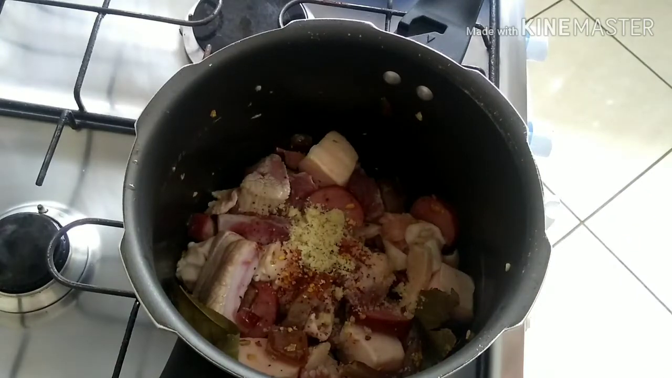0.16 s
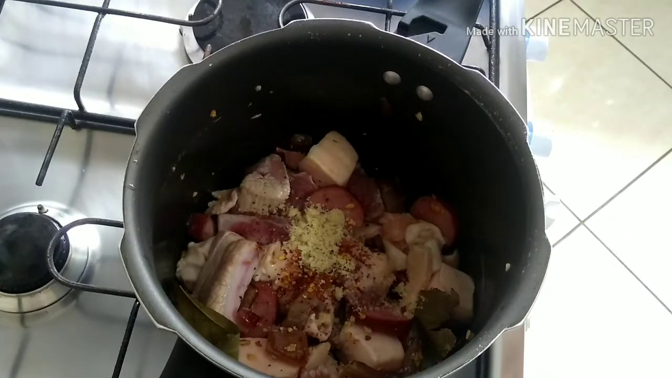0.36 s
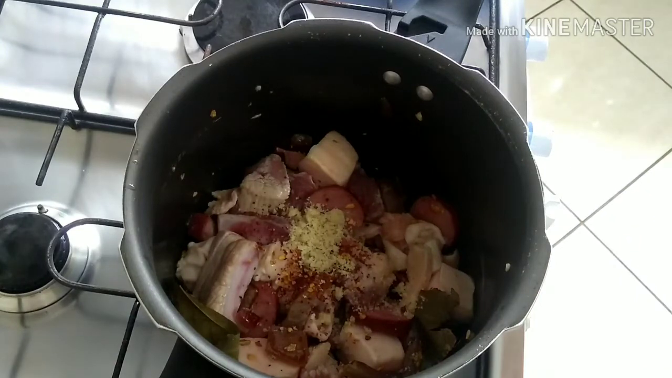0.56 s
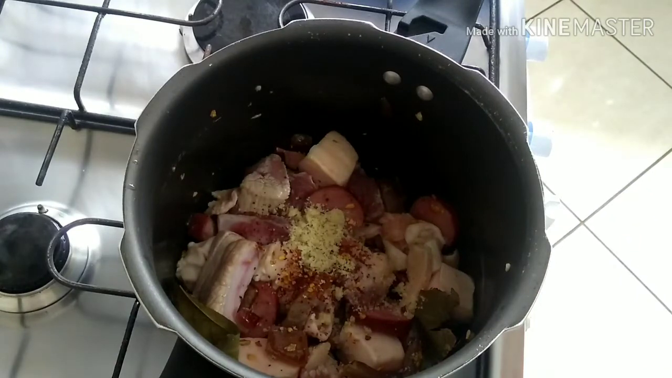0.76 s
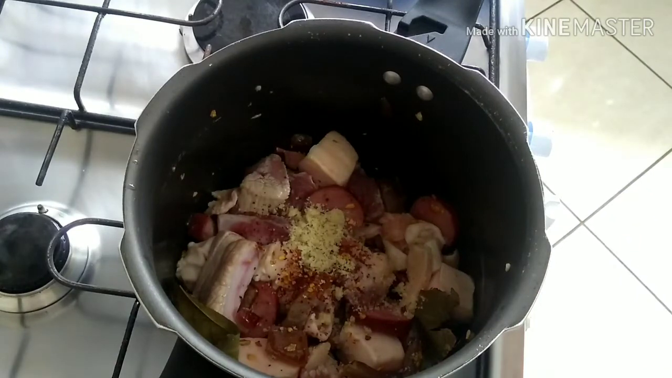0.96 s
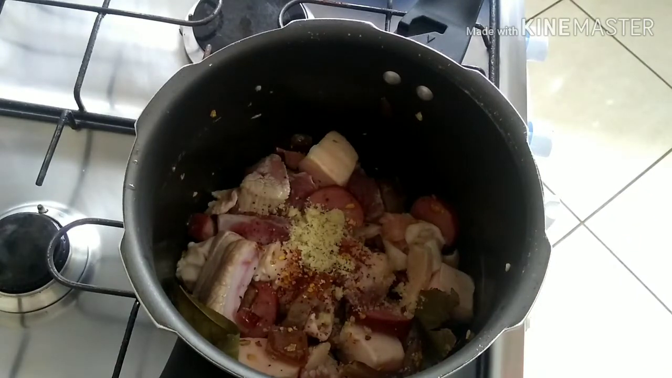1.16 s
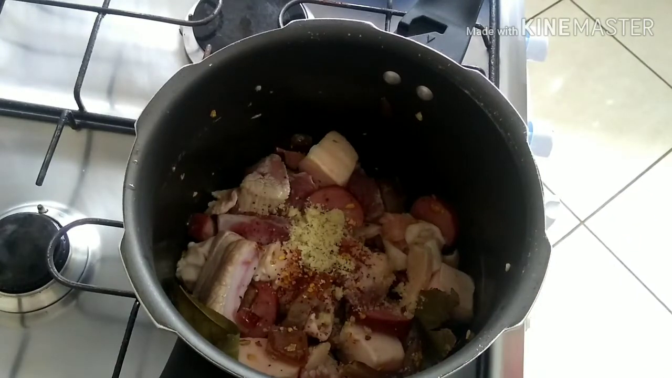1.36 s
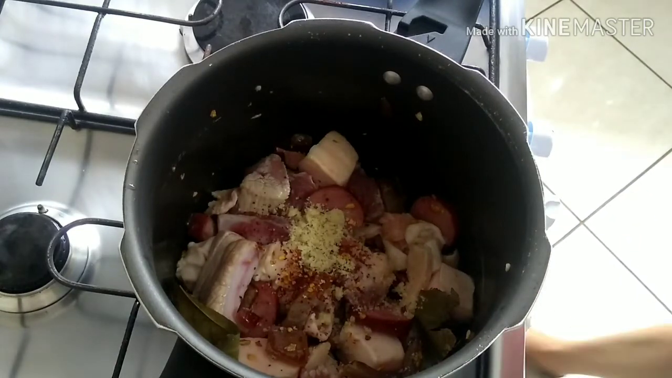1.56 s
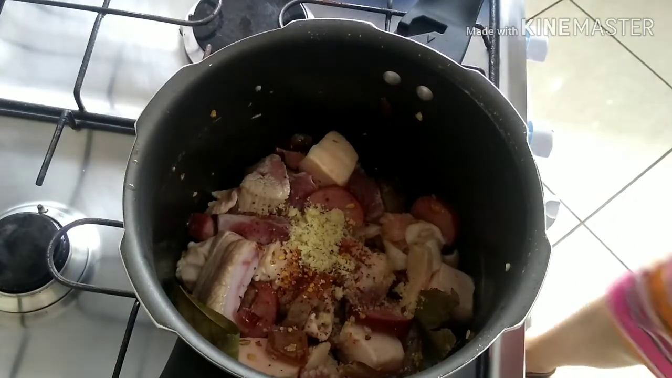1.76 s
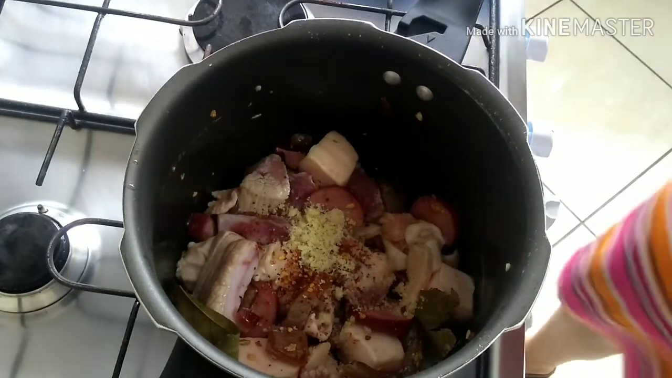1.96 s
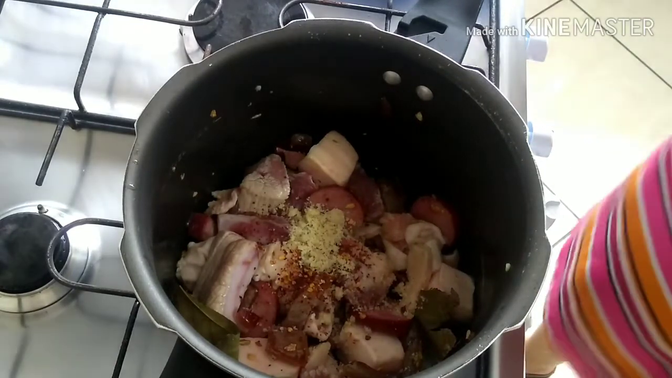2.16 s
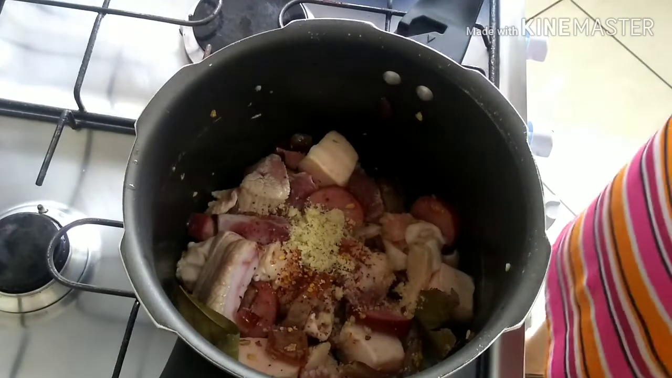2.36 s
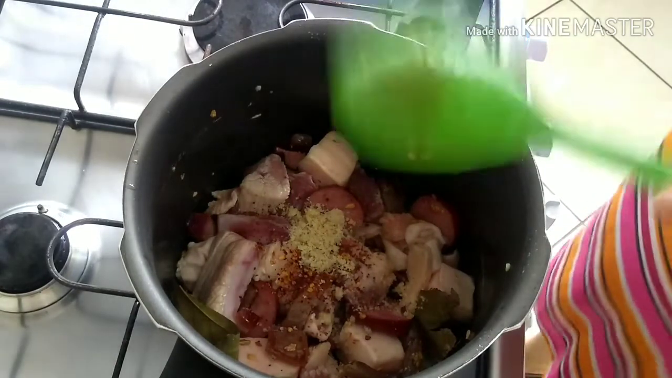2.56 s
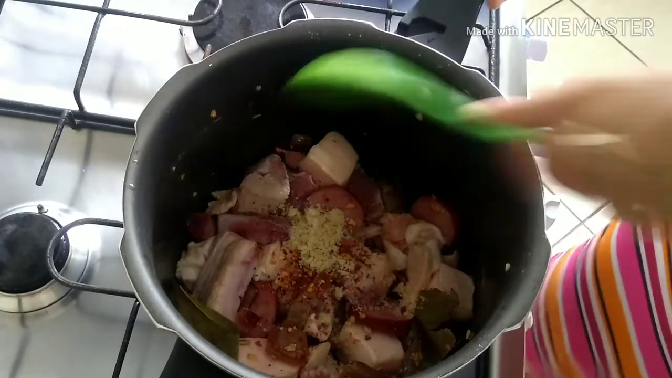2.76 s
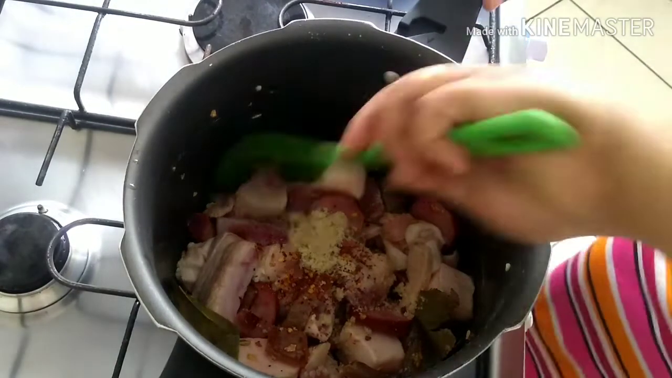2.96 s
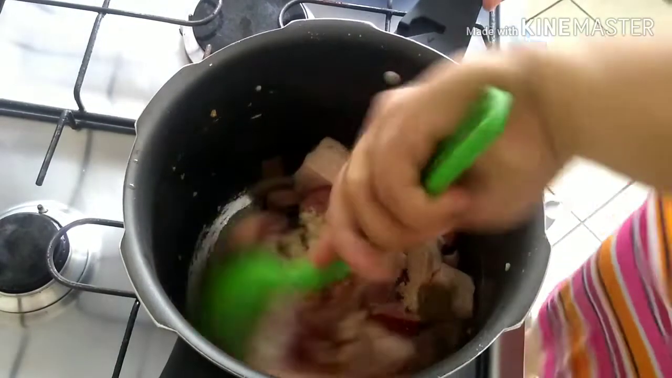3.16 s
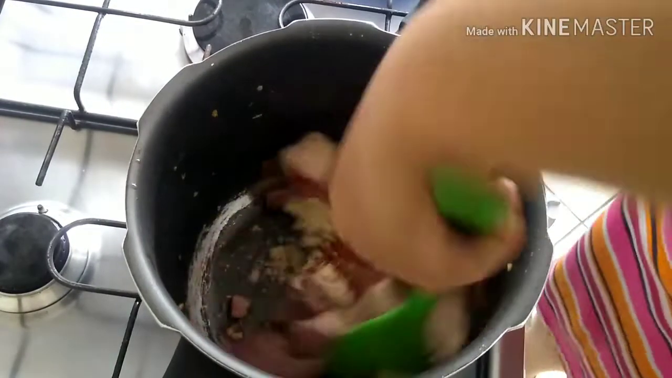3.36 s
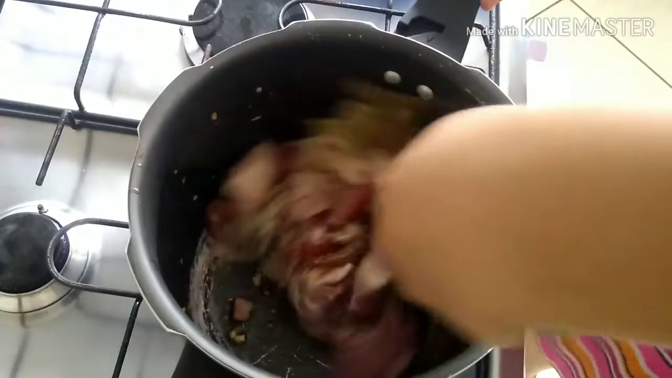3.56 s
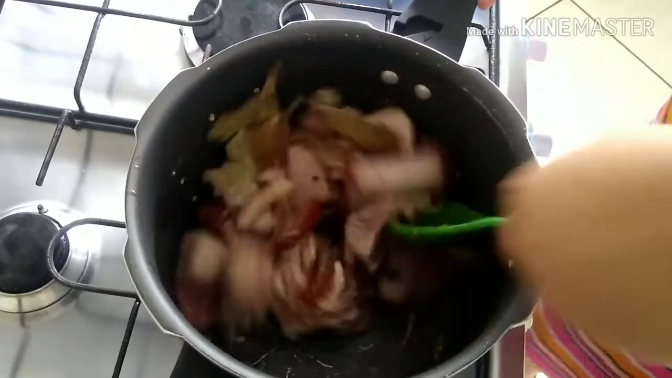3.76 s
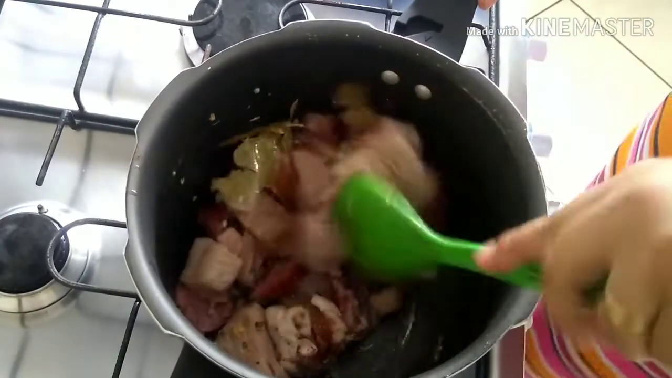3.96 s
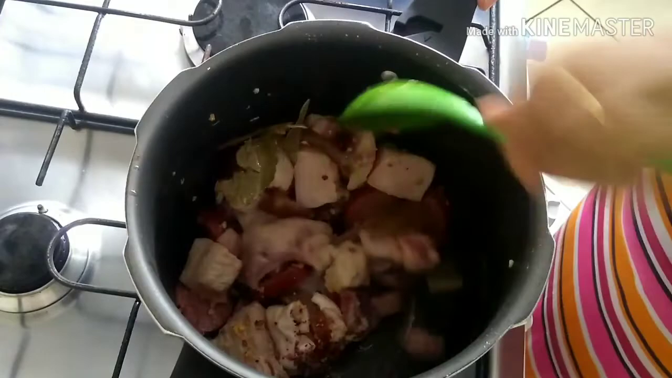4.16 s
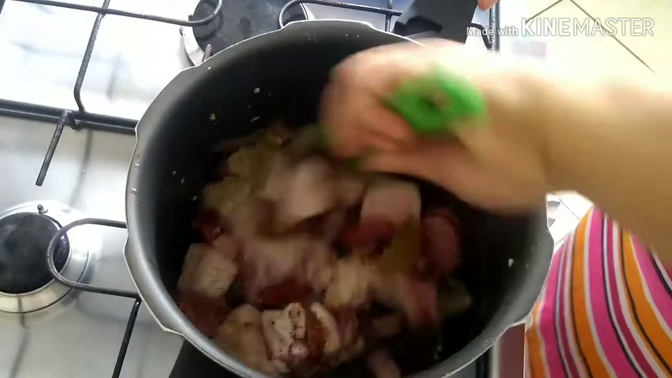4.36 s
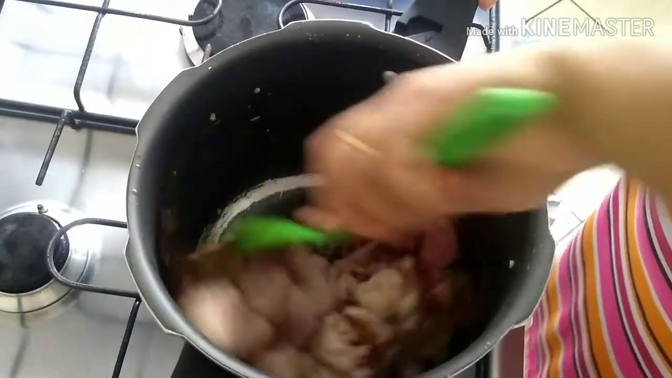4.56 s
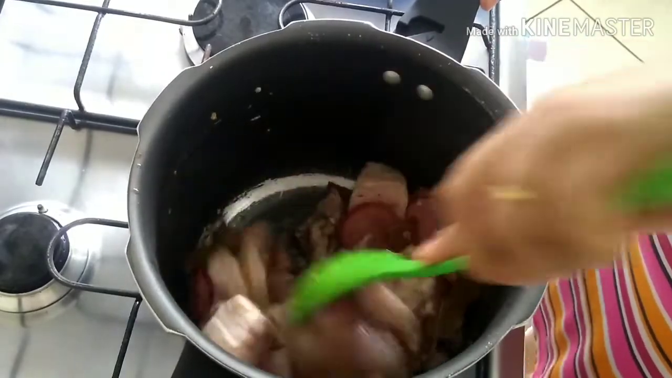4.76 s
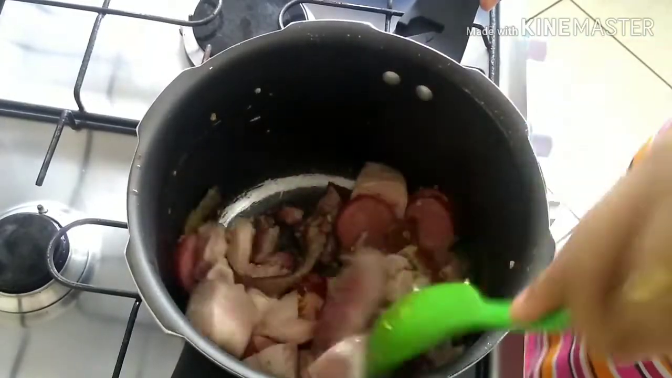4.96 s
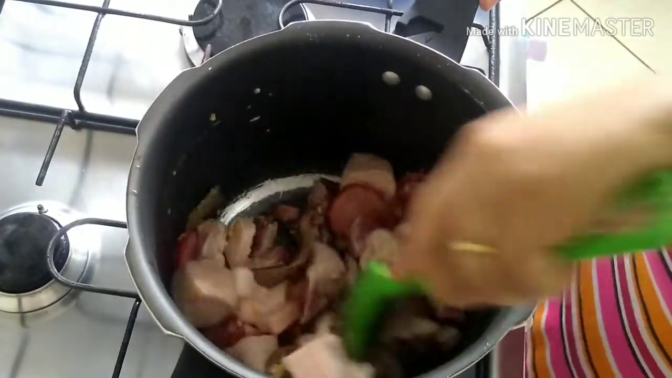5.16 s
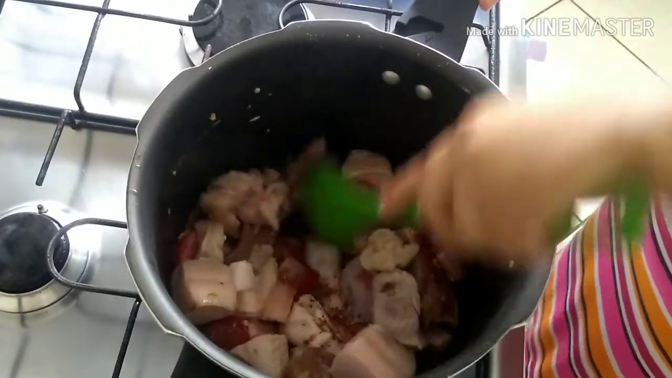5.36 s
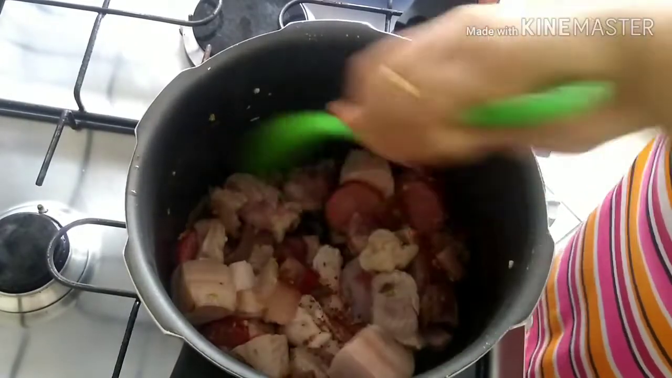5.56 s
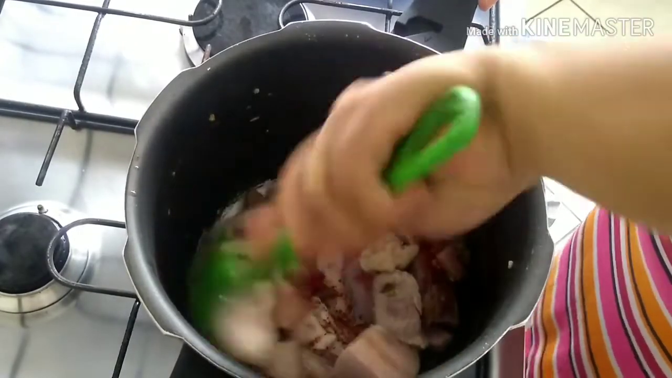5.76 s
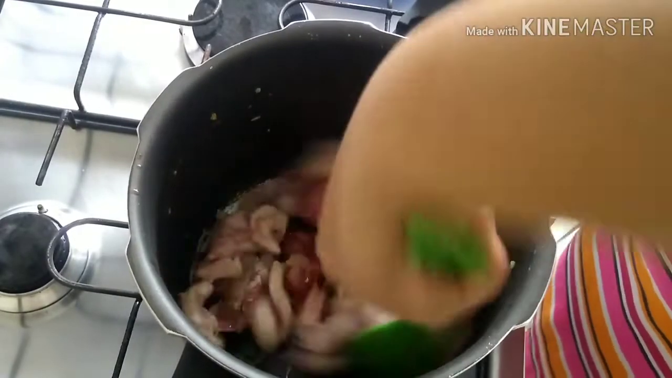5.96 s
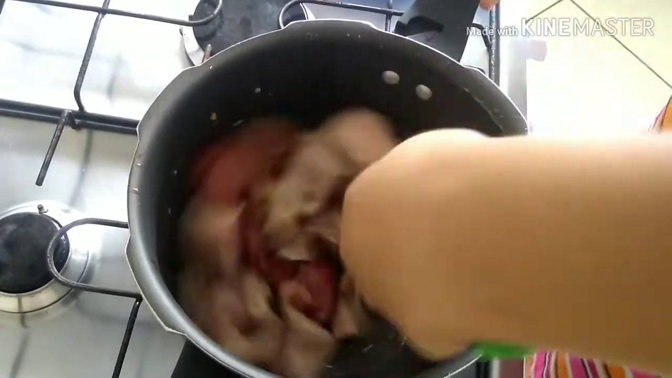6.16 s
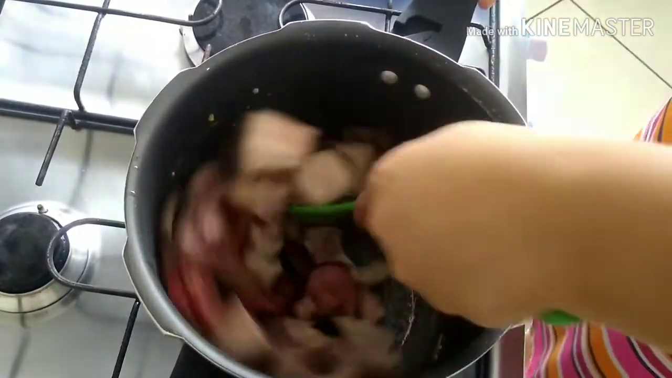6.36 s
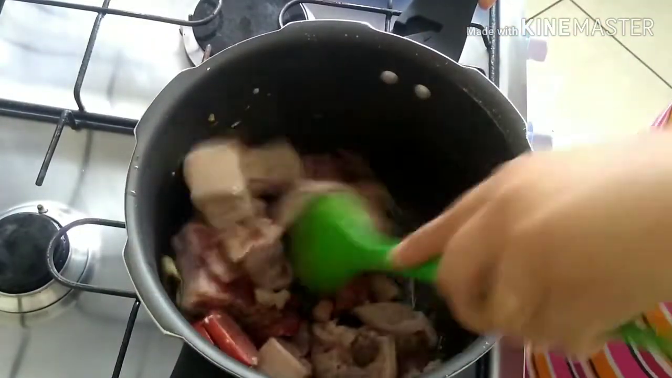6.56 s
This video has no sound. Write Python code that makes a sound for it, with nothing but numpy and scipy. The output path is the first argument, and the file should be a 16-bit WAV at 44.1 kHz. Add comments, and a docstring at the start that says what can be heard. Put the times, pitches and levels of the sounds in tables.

```python
"""In a quiet kitchen, chunks of bacon, sausage and rib fry in a deep metal pot, heard just above its rim.
Fat simmers, crackles and spits: clicks of bursting bubbles are filtered or set ringing. Then a plastic
spoon knocks the pot (dying sine tones), scrapes it and turns the wet meat (filtered clicks), which hisses
brightly as fresh sides meet the hot base. Two microphone ports hear it from one side."""
import sys
import numpy as np
from scipy import signal
from scipy.fft import rfft, irfft, next_fast_len
from scipy.io import wavfile
from scipy.ndimage import map_coordinates

SR = 44100
rng = np.random.default_rng(int(sys.argv[2]) if len(sys.argv) > 2 else 0)


def unload_audio(sound):
    """Save the sound as a 16-bit wav file, at the path given as the first command line argument."""
    columns = np.transpose(np.atleast_2d(sound))
    # keep every value between -1 and 1, then stretch to whole-number steps
    steps = np.round(np.clip(columns, -1, 1) * 32767)
    wavfile.write(sys.argv[1], SR, steps.astype(np.int16))


N = 292383
T = np.arange(N) / SR  # time of each sample [s]

# how slides of the meat and draughts begin and end
SLIDE_ATTACK_S, SLIDE_FADE_DB_PER_S = 0.025, 133


def amp(db):
    """Turns decibels into a gain."""
    return 10 ** (np.asarray(db) / 20)


def unit(x):
    """Scales a sound to rms 1."""
    return x / np.sqrt(np.mean(x ** 2) + 1e-20)


def read(points, hz):
    """Reads a spectrum table on a log-frequency axis."""
    f, value = np.transpose(points)
    return np.interp(np.log(hz + 1), np.log(f + 1), value)


def add(mix, s, sound):
    """Lays a sound into the mix at time s."""
    part = mix[max(round(s * SR), 0):][:len(sound)]
    part += sound[:len(part)]


def band(x, low_hz, high_hz):
    """Keeps one band of pitches."""
    edges = [low_hz, min(high_hz, .48 * SR)]
    return signal.sosfilt(signal.butter(2, edges, "band", fs=SR, output="sos"), x)


def colour(x, points, size=4096):
    """Gives a sound the listed spectrum with a causal filter, so that clicks keep their sharp fronts."""
    log_gain = np.log(amp(read(points, abs(np.fft.fftfreq(size, 1 / SR)))))
    # the Hilbert transform finds the phase that puts the energy first
    taps = np.fft.ifft(np.exp(np.conj(signal.hilbert(log_gain)))).real
    return unit(signal.oaconvolve(x, taps[:size // 2])[:N])


def resonate(x, hz, width):
    """Passes a sound through a resonance of gain 1 that can follow a pitch curve."""
    turn = np.exp(2j * np.pi * np.cumsum(hz * np.ones(len(x))) / SR)
    r = np.exp(-np.pi * width / SR)
    # shift the pitch down to zero, smooth, and shift it back
    smooth = signal.lfilter([1 - r], [1, -r], x / turn + 1e-18)
    return 2 * (turn * smooth).real


def wander(per_s):
    """Drifts at random with rms 1, taking new values per_s times a second."""
    knots = rng.standard_normal(N // 100)
    return unit(np.interp(T * per_s, np.arange(len(knots)), knots))


def gesture(start, length, attack_s, fade_db_per_s):
    """Makes an envelope that rises from its start and, after its length, fades at a steady rate."""
    rise = np.clip((T - start) / attack_s, 0, 1)
    return rise * amp(-fade_db_per_s * np.clip(T - start - length, 0, 1))


def together(gains):
    """Finds the level in dB of unrelated sounds heard at once."""
    return 10 * np.log10(sum(np.square(g) for g in gains) + 1e-12)


def bursts(per_s, spread_db, clump_db, clumps_per_s, largest=4):
    """Clicks of bursting bubbles: many small, a few large, arriving in louder and softer clumps."""
    size = amp(spread_db * np.minimum(rng.exponential(1, N), largest))
    size = size * rng.choice([-1, 1], N) / np.sqrt(per_s)  # more bubbles keep an even power
    happens = rng.random(N) < per_s / SR
    return unit(size * happens * amp(clump_db * wander(clumps_per_s)))


def bubbles(pitch_hz, per_s, scatter, cycles, spread_db, count=12):
    """Families of bubbles of different sizes, each ringing around the common pitch; more cycles ring longer."""
    out = np.zeros(N)
    for place in np.linspace(-1, 1, count):
        hz = pitch_hz * 2 ** (scatter * (place + 0.155 * wander(30)))
        clicks = bursts(per_s / count, spread_db, clump_db=1, clumps_per_s=27)
        out += np.exp(-place ** 2) * resonate(clicks, hz, hz.mean() / cycles)
    return unit(out)


def ticks(per_s, low_hz, high_hz, spread_db, clump_db, count=5):
    """Tiny bursts of several sizes; each size ticks in its own band at its own moments."""
    edges = np.linspace(low_hz, min(high_hz, .45 * SR), count + 1)
    out = np.zeros(N)
    for lo, hi in zip(edges, edges[1:]):
        clicks = bursts(per_s / 2, spread_db, clump_db, clumps_per_s=45)
        out += band(band(clicks, lo, hi), lo, hi)
    return unit(out)


def swells(rows, taper, ragged_db, sag_octaves=0):
    """Short, ragged swells of noise, each sent three times through one resonance whose pitch may sink."""
    out, size = np.zeros(N), SR // 2
    for s, length, hz, width, db in rows:
        n = int(np.clip(length * SR, 16, size))
        # only the last n samples are kept, once the resonance has built up
        sag = np.interp(np.arange(size), [size - n, size], [.5, -.5])
        pitch = hz * 2 ** (sag_octaves * sag)
        ring = rng.standard_normal(size) * amp(ragged_db * wander(250)[:size])
        for factor in (2.0, 0.7, 0.48):
            ring = resonate(ring, pitch, factor * width)
        add(out, s, amp(db) * unit(ring[-n:] * signal.windows.tukey(n, taper)))
    return out


def shifting(x):
    """Patches of fat boil up and die down, so the colour of the sizzle keeps shifting."""
    shift_db, shift_width_hz, shift_s = 1.8, 280, .03  # strength and size of the patches
    hz, t, z = signal.stft(x, SR, nperseg=512, noverlap=384)
    place = np.meshgrid(hz / shift_width_hz, t / shift_s, indexing="ij")
    knots = rng.standard_normal([int(p.max()) + 2 for p in place])
    patches = map_coordinates(knots, place, order=3, mode="nearest")
    return signal.istft(z * unit(amp(shift_db * patches)), SR, nperseg=512, noverlap=384)[1][:N]


def frying():
    """Heat sets the steady sizzle; slides squeeze out more simmer, and flares add crackle and hiss."""
    # steam builds under the meat, escapes in one big spit and builds again; stirring frees more:
    # (time [s], level of the simmer [dB])
    simmer_levels = [(0, -39), (.25, -40), (.4, -35), (1.31, -29), (1.335, -43), (1.53, -37), (2.05, -40.5),
                     (2.72, -32.5), (2.92, -29), (3.02, -26), (3.12, -27), (3.28, -26), (3.4, -29),
                     (3.7, -34.5), (4.05, -38.5), (4.6, -35.5), (4.8, -30.5), (5.15, -32.5), (5.42, -31),
                     (5.5, -30.5), (5.7, -33), (6.2, -25), (6.55, -37)]
    # fresh sides of the meat meet the hot base, then dry:
    # (time [s], level of the hiss [dB], brightness of the hiss [dB])
    sear_levels = [(0, -44, -11.5), (.6, -51, -3), (.9, -39.5, -10), (1.31, -47, -7.5), (1.5, -57.5, -4),
                   (2.1, -57, -15), (2.5, -46.5, -6), (2.9, -50, -10), (3.421, -34, -11.5),
                   (3.72, -28, -2.5), (3.95, -26.5, -0.5), (4.08, -31, -4.5), (4.25, -27, -4.5),
                   (4.47, -31.5, -7.5), (4.883, -22.5, -10), (5.4, -33.5, -17.5), (5.9, -43.5, -11.5),
                   (6.63, -52, 7.5)]
    # wet meat slips and squelches, settling by itself or pushed by the spoon:
    # (start [s], length before the fade [s], level [dB])
    slide_moves = [(0, 0.026, -38.5), (0.363, 0.069, -33.5), (1.039, 0.015, -37), (1.21, 0.028, -42),
                   (2.79, 0.027, -34), (2.927, 0.19, -35), (3.13, 0.073, -41), (3.224, 0.077, -29.5),
                   (3.393, 0.29, -31), (3.76, 0.14, -38.5), (4.237, 0.11, -34), (4.413, 0.16, -34.5),
                   (5.695, 0.035, -32), (5.922, 0.023, -44), (6.106, 0.15, -34)]
    # juice runs into hot fat and flares up:
    # (start [s], length before the fade [s], crackle level [dB], hiss level [dB])
    flare_ups = [(0.258, 0.074, -31, -43), (0.682, 0.058, -29, -63), (1.024, 0.16, -28.5, -79),
                 (1.23, 0.072, -25, -38.5), (1.297, 0.05, -50, -39), (1.671, 0.16, -31, -51.5),
                 (2.376, 0.11, -29.5, -49), (2.776, 0.084, -26.5, -45), (2.912, 0.045, -22.5, -39),
                 (2.999, 0.023, -23, -39), (3.126, 0.1, -27.5, -34.5), (3.233, 0.076, -21, -28.5),
                 (3.453, 0.084, -21.5, -33.5), (4.103, 0.11, -24, -53), (4.68, 0.12, -22.5, -30.5),
                 (5.45, 0.27, -24, -59), (5.745, 0.2, -23.5, -64), (5.888, 0.2, -30.5, -50),
                 (6.166, 0.15, -38, -36.5), (6.315, 0.048, -28, -56)]
    rest_db, stirred_db = -62.5, -45  # the juice between slides: always, and added while the spoon is in
    stir_start_s, stir_end_s = 2.77, 6.35
    squeeze_db = -6.5  # simmer squeezed out by a slide, relative to the slide
    crackle_below_db, crackle_follow = -13, 0.53  # steady crackle grows with the hiss, in dB per dB

    stir = gesture(stir_start_s, stir_end_s - stir_start_s, SLIDE_ATTACK_S, SLIDE_FADE_DB_PER_S)
    slides = [amp(rest_db), amp(stirred_db) * stir]
    for s, length, db in slide_moves:
        slides.append(amp(db) * gesture(s, length, SLIDE_ATTACK_S, SLIDE_FADE_DB_PER_S))
    slide_db = together(slides)
    steady_simmer = amp(np.interp(T, *np.transpose(simmer_levels)))
    simmer_db = together([steady_simmer, amp(slide_db + squeeze_db)])

    times, *columns = np.transpose(sear_levels)
    hiss_db, bright_db = (np.interp(T, times, c) for c in columns)
    crackle, hiss = [amp(crackle_follow * hiss_db + crackle_below_db)], [amp(hiss_db)]
    for s, length, crackle_db, flare_db in flare_ups:
        flare = gesture(s, length, attack_s=0.011, fade_db_per_s=334)
        crackle.append(amp(crackle_db) * flare)
        hiss.append(amp(flare_db) * flare)

    # bubbles of all sizes burst in the same clumps and lulls
    flutter_db = 0.47 * wander(46)
    sizzle = simmering(simmer_db + .5 * flutter_db)
    sizzle = sizzle + crackling(together(crackle) + flutter_db)
    sizzle = sizzle + searing(together(hiss) + flutter_db, bright_db)
    sizzle = sizzle + sliding(slide_db)
    return signal.sosfilt(signal.butter(2, 110, "high", fs=SR, output="sos"), sizzle)


def simmering(level_db):
    """Fat simmers, the largest bubbles blub in the juice, and the patter keeps the pot wall ringing."""
    # spectrum of the simmer: (frequency [Hz], relative level [dB])
    simmer_spectrum = [(150, -42.5), (400, -27), (900, -35), (1020, -22.5), (1120, -4), (1250, -4.5),
                       (1500, 0), (2000, 1), (2650, 3), (3300, -14), (4400, -87), (6000, -55), (9000, -95),
                       (16000, -53)]
    clicks = bursts(5000, spread_db=2.5, clump_db=0.3, clumps_per_s=41)
    simmer = amp(level_db + 5.0) * colour(clicks, simmer_spectrum)
    blubs = bubbles(581.0, per_s=56, scatter=0.42, cycles=89, spread_db=8.5)
    blubs = amp(.5 * level_db - 41.0) * blubs
    return simmer + band(blubs, 486, 670) + amp(0.67 * level_db - 22.0) * ringing_wall()


def ringing_wall():
    """The pot wall rings thinly in narrow resonances; each comes and goes as the spatter moves about."""
    # rings of the wall: (pitch [Hz], width before narrowing [Hz], relative level before wavering [dB])
    wall_rings = [(1085, 15, 25), (1708, 78, 8), (2890, 210, 24), (3650, 50, 19.5), (4985, 110, 16.5),
                  (5690, 160, 23), (6420, 43, -3), (7600, 79, 7.5), (8000, 100, -12), (8300, 41, -17),
                  (10860, 100, 18), (11370, 200, 17.5), (11600, 200, 10)]
    waver_db, waver_per_s = 1.3, 22
    patter = bursts(2500, spread_db=4, clump_db=2, clumps_per_s=25)
    wall = np.zeros(N)
    for hz, width, db in wall_rings:
        ring = resonate(resonate(patter, hz, 0.86 * width), hz, 0.86 * width)
        wall += amp(db + waver_db * wander(waver_per_s)) * unit(ring)
    return unit(wall)


def crackling(level_db):
    """Small bubbles burst around one common pitch; a few snap sharply."""
    # the size of the small bubbles sets their pitch: (time [s], centre pitch [Hz])
    bubble_pitch = [(0, 2860), (1.15, 3006), (1.4, 2760), (2.3, 2550), (2.85, 2915), (3.4, 3230),
                    (3.8, 3720), (4.8, 3980), (5.5, 3990), (5.82, 3620), (6.05, 3470), (6.6, 2720)]
    pitch = np.interp(T, *np.transpose(bubble_pitch))
    dense = bubbles(pitch, per_s=3000, scatter=0.416, cycles=28, spread_db=1.0)
    dense = amp(level_db - 5.5) * unit(band(dense, 1300, 4100))
    snaps = ticks(220, 1100, 3700, spread_db=3.5, clump_db=1, count=2)
    return dense + amp(.55 * level_db - 22.5) * snaps


def searing(sear_db, bright_db):
    """A gentle sizzle is a fine patter of ticks; a hard sear is so many that they merge into hiss."""
    # spectrum of the sear: (frequency [Hz], relative level [dB])
    sear_spectrum = [(300, -37), (1500, -5), (2300, -10), (2700, 5), (3400, 2), (4100, 4.5), (4500, -4.5),
                     (5000, 1.5), (5450, -1), (6000, -1), (6600, -1.5), (7200, -23), (9000, -17),
                     (15300, -26)]
    ticks_per_s = 1500 + 4200 * amp(.8 * (sear_db + 32))
    clicks = bursts(ticks_per_s, spread_db=3.5, clump_db=.5, clumps_per_s=53)
    sear = amp(sear_db - 3.0) * colour(clicks, sear_spectrum)
    # the brightness lifts the fine spray, and the finer fizz even more
    spray = ticks(ticks_per_s, 5940, 10700, spread_db=6.5, clump_db=1.0, count=3)
    spray = amp(sear_db + 0.5 * bright_db - 8.5) * spray
    fizz = ticks(2.9 * ticks_per_s, 6600, 15500, spread_db=7.5, clump_db=2.0)
    fizz = amp(sear_db + bright_db) * fizz
    # the tiniest bubbles whistle briefly as they vent
    pips = bubbles(8000, per_s=300, scatter=.6, cycles=55, spread_db=4.5)
    pips = amp(.75 * sear_db - 23) * unit(band(pips, 5000, 13000))
    return sear + spray + fizz + pips


def sliding(level_db):
    """Wet meat sticks and slips on the base: a dense run of clicks with a low, wet colour."""
    # spectrum of the slipping meat: (frequency [Hz], relative level [dB])
    slide_spectrum = [(60, -34), (200, -58), (330, -29), (410, -16), (490, -1.5), (620, -3.5), (760, -10),
                      (950, -4), (1300, -6.5), (2200, -26), (6000, -74)]
    clicks = bursts(2200, spread_db=2.5, clump_db=1, clumps_per_s=43)
    return amp(level_db) * colour(clicks, slide_spectrum)


def spits():
    """A large bubble of fat bursts: a few dying cycles and a short spatter of droplets."""
    # spits of fat: (time [s], level before filtering [dB], pitch [Hz], time for the ring to fall 60 dB [s])
    spit_events = [(.2505, -18, 3500, .005), (.279, -14, 3500, .005), (.325, -16.5, 3400, .005),
                   (.70, -14.5, 3000, .006), (.837, -14, 8000, .004), (.8435, -12.5, 9200, .006),
                   (.8845, -19, 8400, .007), (.9025, -20, 9000, .005), (.931, -21, 9600, .005),
                   (.9455, -21, 11300, .008), (1.0165, -6, 3000, .009), (1.123, -23, 6450, .012),
                   (1.1403, -16, 3900, .009), (1.3175, 0, 6000, .0024), (1.7555, -17, 2850, .01),
                   (1.961, -21.5, 3100, .008), (2.3965, -16.5, 3200, .01), (2.9535, -14, 3000, .004),
                   (2.976, -14, 3200, .004), (3.0245, -12, 2800, .005), (3.0895, -15, 3200, .003),
                   (3.136, -15, 3400, .004), (3.1563, -9, 3000, .004), (3.311, -5, 2200, .003),
                   (3.686, -13, 5800, .006), (3.98, -13, 6000, .003), (4.003, -13, 3540, .005),
                   (4.2574, -15, 3640, .006), (4.643, -15, 3730, .006), (5.0415, -7, 4600, .002),
                   (5.4645, -12, 3400, .003), (5.49, -11, 3800, .005), (5.517, -16, 3700, .004),
                   (5.54, -15, 3700, .004), (5.6165, -6, 3700, .004), (5.6938, -10, 3700, .008),
                   (5.785, -18, 3730, .015), (5.828, -14, 3800, .005), (5.8488, -19, 3760, .01),
                   (5.9965, -15, 4010, .004), (6.043, -16, 3080, .008)]
    droplets_db, droplets_s = -24, .0022  # level relative to the ring, and decay time
    spread = 1.9  # a spit sounds mostly within this factor of its pitch
    out, t = np.zeros(N), np.arange(SR // 20) / SR
    for s, db, hz, t60 in spit_events:
        ring = amp(-60 * t / t60) * np.sin(2 * np.pi * hz * t)
        noise = unit(band(rng.standard_normal(len(t)), .7 * hz, 2.2 * hz))
        droplets = amp(droplets_db) * np.exp(-t / droplets_s) * noise
        spit = band(ring + droplets, hz / spread, hz * spread)
        add(out, s, amp(db) * band(spit, hz / 4, hz * spread))
    return out


def knocks():
    """The spoon smacks the pot, which rings in dying sine tones that the meat soon damps."""
    # tones of the struck pot, before each knock's factors:
    # (pitch [Hz], relative level [dB], time to fall 60 dB [s])
    pot_tones = [(480, -11, .08), (614, 0, .15), (632, -13, .45), (690, -7, .14), (800, -11, .06),
                 (920, -11, .07), (1130, -12, .1), (1244, -11, .12), (1480, -10, .1), (1776, -13, .12),
                 (3640, -5, .07)]
    # spoon knocks: (time [s], level [dB], treble tilt [dB per octave],
    # pitch factor from where the spoon lands [ratio], factor on the ring time [ratio])
    knock_events = [(2.668, -37, -8, 1, 1.3), (2.742, -41, -2, .86, 1.2), (2.789, -26, 3.5, 1.01, 1.2),
                    (2.806, -26, -1, 1.03, .8), (2.83, -35, 1, 1, 1), (3.012, -31, 5, 1, .5),
                    (3.248, -29, -3, .92, 1), (3.311, -26, 1, .9, .3), (3.86, -28, -1, .9, .4),
                    (4.253, -23, 0, .92, .3), (4.823, -35, 5, .95, .5), (5.032, -36, -6, .93, .7),
                    (5.39, -27.5, -1, 1.1, 1.1), (5.463, -36, -3, 1.1, .8), (5.649, -22, -1, 1.015, 1.15),
                    (6.172, -32, 1, .95, .7)]
    contact_db, contact_s = 3, .0045  # dull smack at the front: level relative to the knock, decay time
    out, t = np.zeros(N), np.arange(SR // 2) / SR
    press = 1 - np.exp(-t / .0015)  # the tones build up softly
    for s, db, tilt_db, pitch, ring in knock_events:
        smack = unit(band(rng.standard_normal(len(t)), 960, 2070))
        add(out, s, amp(db + contact_db) * np.sqrt(ring) * np.exp(-t / contact_s) * smack)
        for hz, tone_db, t60 in pot_tones:
            level = amp(db + tone_db + tilt_db * np.log2(hz / 614))
            decay = np.exp(-np.log(1000) * t / (ring * t60))
            tone = np.sin(2 * np.pi * (pitch * hz * t + rng.random()))
            add(out, s, press * level * decay * tone)
    return band(band(out, 410, 9000), 410, 9000)


def scrapes():
    """The spoon scrapes along the base and wall; each scrape sinks in pitch as the spoon slows."""
    # scrapes: (time [s], length [s], middle pitch [Hz], width before shaping [Hz], level [dB])
    scrape_events = [(2.789, 0.027, 3640, 300, -27), (2.81, 0.09, 3570, 300, -35),
                     (2.945, .12, 1100, 110, -32.5), (3.003, 0.03, 1557, 220, -22),
                     (3.25, 0.07, 1224, 200, -29.5), (3.47, 0.34, 1608, 260, -32),
                     (4.81, 0.03, 1270, 251, -30.5), (4.97, 0.035, 1440, 220, -30),
                     (5.775, 0.069, 4560, 600, -35), (5.88, 0.16, 1120, 160, -37),
                     (5.93, 0.1, 3980, 200, -36), (6.09, 0.16, 1006, 170, -32),
                     (6.11, 0.18, 1640, 450, -31.5), (6.02, 0.2, 5540, 1500, -47.5)]
    return swells(scrape_events, taper=0.097, ragged_db=-2, sag_octaves=0.094)


def squeaks():
    """Escaping steam squeaks and sputters: noise of uneven level in one resonance."""
    # squeaks: (time [s], length [s], pitch [Hz], width before shaping [Hz], level [dB])
    squeak_events = [(.84, 0.12, 9300, 2230, -38.5), (.92, 0.097, 11260, 900, -39.5),
                     (1.305, 0.032, 7100, 1510, -41), (1.783, 0.011, 15300, 2000, -32),
                     (2.2, 0.052, 11500, 900, -43), (2.5, 0.038, 10600, 5000, -41),
                     (2.575, 0.016, 5800, 400, -38), (3.24, 0.097, 5200, 1490, -34.5),
                     (3.324, 0.0036, 11600, 3000, -27), (6.17, 0.11, 6050, 1475, -40),
                     (6.484, 0.039, 11200, 1320, -37.5)]
    return swells(squeak_events, taper=0.17, ragged_db=5)


def booms():
    """Rubbing makes the pot boom, with the judder of sticking and slipping; each boom sinks in pitch."""
    # hollow booms and rubs:
    # (time [s], length [s], middle pitch [Hz], width before shaping [Hz], level before judder [dB])
    boom_events = [(0, 0.065, 357, 130, -47.5), (0, 0.2, 757, 150, -51.5), (.355, 0.1, 877, 87, -36.5),
                   (.39, 0.1, 720, 296, -45), (.42, 0.2, 460, 129, -50), (.5, .14, 810, 250, -49.5),
                   (1.6, 0.1, 726, 90, -61), (1.83, 0.058, 475, 70, -59), (.83, 0.19, 275, 111, -57),
                   (1.39, 0.096, 262, 35, -53), (2.785, 0.075, 290, 228, -42), (2.8, 0.2, 227, 85, -46.5),
                   (3.06, 0.15, 126, 69.6, -58), (4.45, 0.061, 232, 45, -43.5), (4.43, 0.16, 270, 130, -58)]
    judder_db, judder_per_s = 3, 170
    judder = unit(amp(judder_db * wander(judder_per_s)))
    return judder * swells(boom_events, taper=0.2, ragged_db=-2.0, sag_octaves=0.024)


def thumps():
    """Dull thumps sound now and then: one brief, low push each."""
    # dull thumps: (time [s], level before filtering [dB], decay time [s])
    thump_events = [(1.3176, -34, .0009), (3.10, -50, .003), (3.311, -44, .001), (4.56, -58, .002)]
    out, t = np.zeros(N), np.arange(SR // 10) / SR
    for s, db, decay_s in thump_events:
        add(out, s, amp(db) * np.exp(-t / decay_s))
    return band(out, 35, 600)


def mist():
    """Countless tiny bubbles all over the base: an airy fizz that never stops and differs at each port."""
    # spectrum of the finest fizz: (frequency [Hz], relative level [dB])
    mist_spectrum = [(3000, -17), (4500, -22), (5400, 4), (5750, 10), (6100, 2), (6500, 5), (7200, -3),
                     (8500, 3.5), (10500, -4), (11400, 2), (12300, -6), (15500, -6)]
    heard = []
    for _ in range(2):
        fizz = ticks(9000, 3000, 17000, spread_db=3.5, clump_db=2, count=9)
        heard.append(shifting(colour(fizz, mist_spectrum)))
    return amp(-60) * np.array(heard)


def draughts():
    """Air stirred by the moving arm rumbles faintly, unrelated at each port."""
    # draughts: (start [s], length before the fade [s], level [dB])
    draught_events = [(0, .25, -84), (1.5, 1.5, -83), (3.08, 0.18, -64), (4.48, 0.15, -65),
                      (5.65, .9, -71.5)]
    level = np.zeros(N)
    for s, length, db in draught_events:
        level += amp(db) * gesture(s, length, SLIDE_ATTACK_S, SLIDE_FADE_DB_PER_S)
    return level * unit(band(rng.standard_normal((2, N)), 25, 180))


def kitchen():
    """Quiet room noise, different at each port, and a faint appliance hum with a wandering phase."""
    # spectrum of the room noise: (frequency [Hz], relative level [dB])
    room_spectrum = [(20, -36), (70, -39), (115, 26), (150, 21), (220, 26.5), (320, 12), (600, -2),
                     (2000, -24), (16000, -19)]
    room_db, hum_db = -74.5, -77.5
    air = np.array([colour(rng.standard_normal(N), room_spectrum) for _ in range(2)])
    hum = np.sin(2 * np.pi * 146 * T + .3 * wander(3))
    return amp(room_db) * air + amp(hum_db) * hum


def echoes(x, t60, gap_s, count=9000, order=3):
    """Dense dying reflections, different at each port and for each place in the pot where a sound starts."""
    t = np.arange(count) / SR
    decay = np.exp(-np.log(1000) * t / t60) * (t > gap_s)
    taps = rng.standard_normal((order, 2, count)) * decay
    taps /= np.linalg.norm(taps, axis=2, keepdims=True)
    # the sound drifts between the places at an even total power
    places = np.array([wander(20) for _ in range(order)])
    places /= np.linalg.norm(places, axis=0)
    return signal.oaconvolve((places * x)[:, None], taps, axes=2).sum(0)[:, :N]


def ports(x):
    """The far, left port hears the treble late; the bass is nearly in step."""
    # phase between the ports: (frequency [Hz], lead of the left port [radians])
    port_phase = [(0, 0), (430, 1.2), (1640, -0.9), (2070, -2.6), (2580, -3.6), (3270, -6.0), (3790, -6.8),
                  (4820, -9.6), (5430, -11.6), (5940, -12.1), (7840, -17.1), (8440, -18.3), (14600, -33.4),
                  (15800, -35.6)]
    size = next_fast_len(N + 1000)
    turn = np.interp(np.fft.rfftfreq(size, 1 / SR), *np.transpose(port_phase))
    left = irfft(rfft(x, size) * np.exp(1j * turn), size)[:N]
    return np.array([left, x])


def scene():
    """Everything sounds inside the pot, then in the kitchen."""
    sizzle = frying() + squeaks() + scrapes()
    # a narrow dip at 2320 Hz makes the sizzle hollow
    sizzle = sizzle - .58 * resonate(sizzle, 2320, width=220)
    sizzle = shifting(sizzle)
    hollow = knocks() + thumps() + booms()
    pops = spits()
    direct = ports(amp(-4.0) * sizzle + hollow + pops)
    # treble bounces around the deep pot more than bass does
    into_pot = 0.55 * sizzle + 1.56 * band(sizzle, 3540, 10000) + .5 * pops + 1.1 * hollow
    in_pot = echoes(into_pot, t60=0.039, gap_s=.001)
    in_room = echoes(sizzle + .5 * pops + 3.6 * hollow, t60=0.45, gap_s=0.0053)
    return direct + amp(-9.0) * in_pot + amp(-20.5) * in_room + mist() + draughts() + kitchen()


def record(dry):
    """The recorder's body changes the balance of the ports, mostly shading the left treble; then a treble limit."""
    # balance of the ports: (frequency [Hz], left minus right [dB])
    port_balance = [(100, 0.5), (300, 2.5), (550, -2), (1100, 0), (1600, 4), (2300, -2), (2800, -5),
                    (3600, -2), (5000, -5), (6000, -7), (8000, -5.5), (11000, -11), (14000, -13)]
    edge_hz = 15600
    size = next_fast_len(N + 2000)
    tilt = amp(read(port_balance, np.fft.rfftfreq(size, 1 / SR)))
    # the square root keeps the power of the two ports together unchanged
    shade = np.array([tilt, np.ones_like(tilt)]) * np.sqrt(2 / (1 + tilt ** 2))
    heard = irfft(rfft(dry, size) * shade, size)[:, :N]
    low_pass = signal.firwin(511, edge_hz, window=("kaiser", 9), fs=SR)
    return signal.oaconvolve(heard, low_pass[None], "same")


dry = scene()
out = record(dry)
unload_audio(out)
```